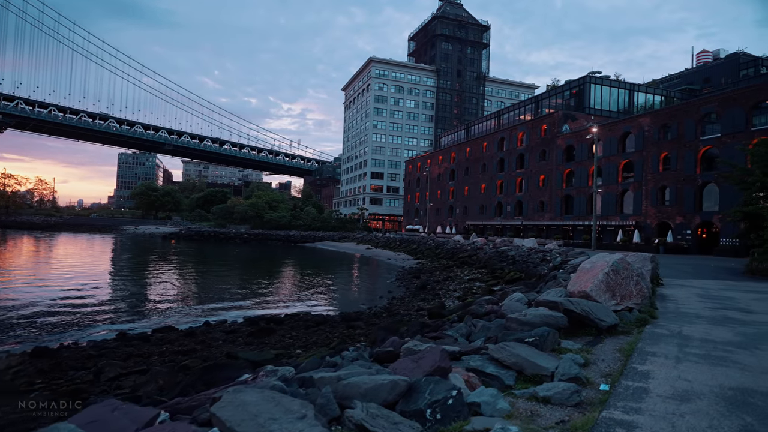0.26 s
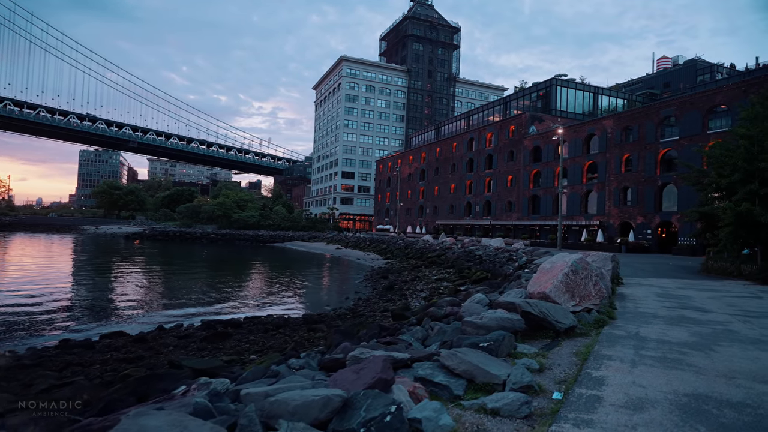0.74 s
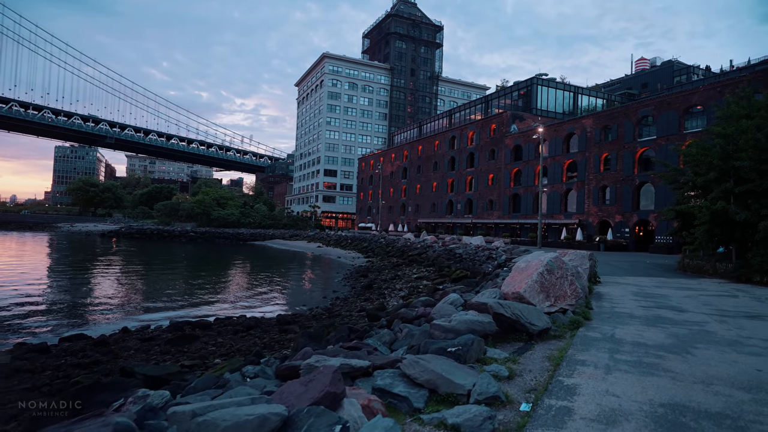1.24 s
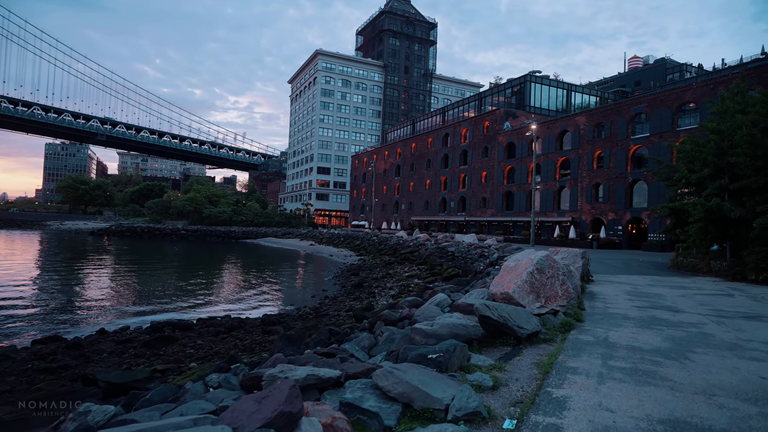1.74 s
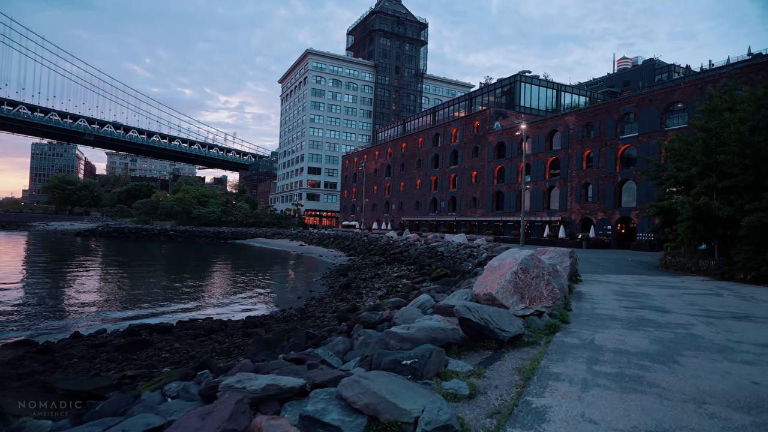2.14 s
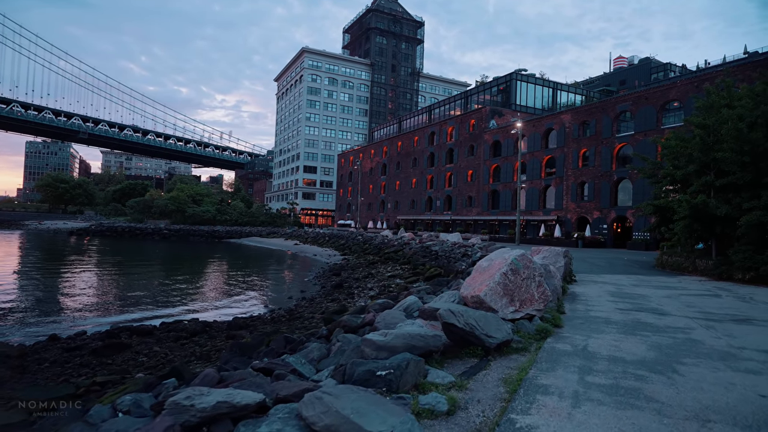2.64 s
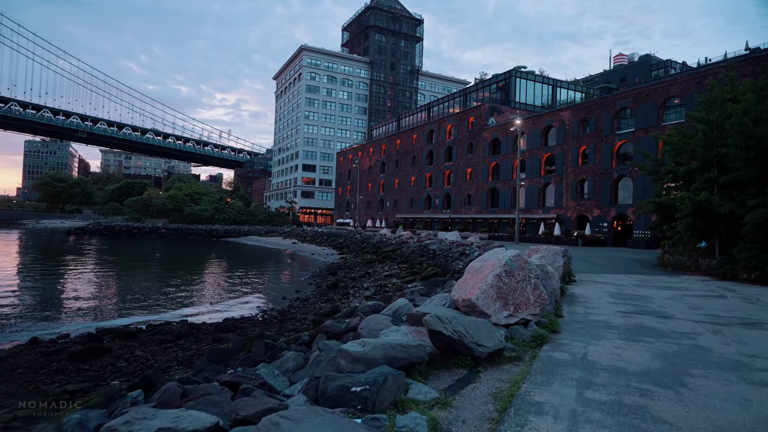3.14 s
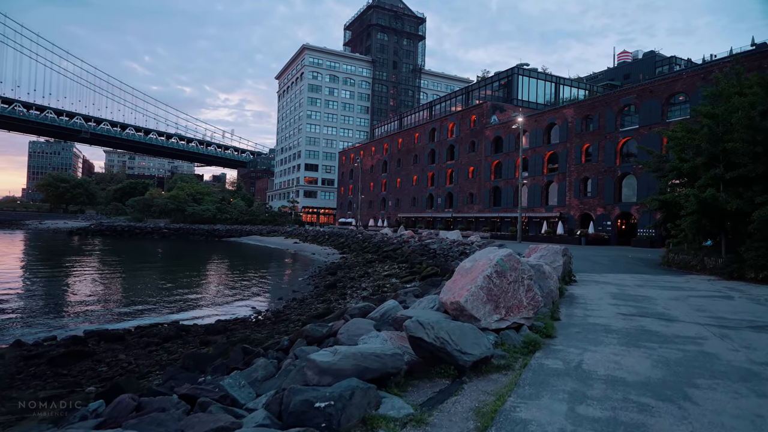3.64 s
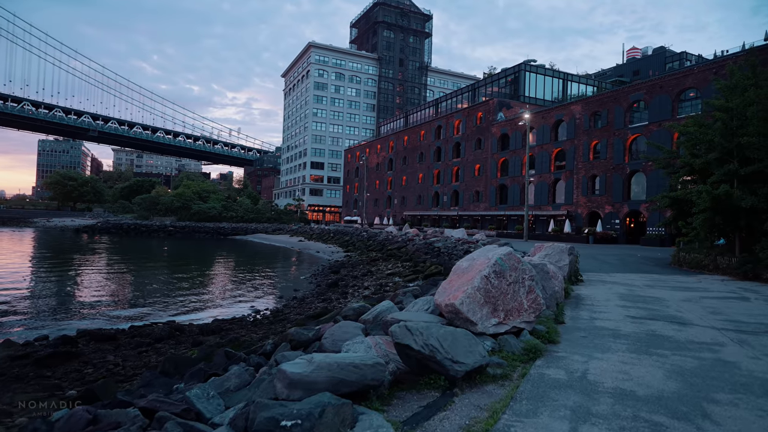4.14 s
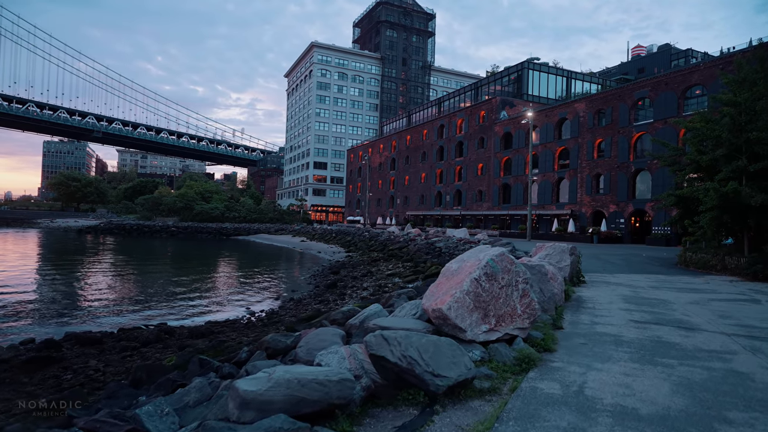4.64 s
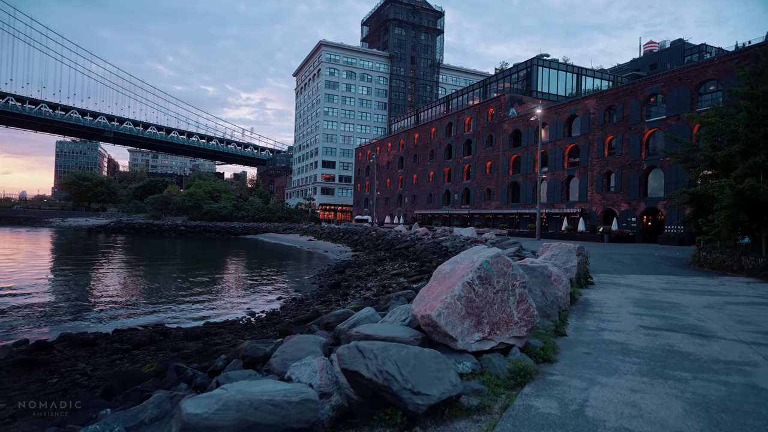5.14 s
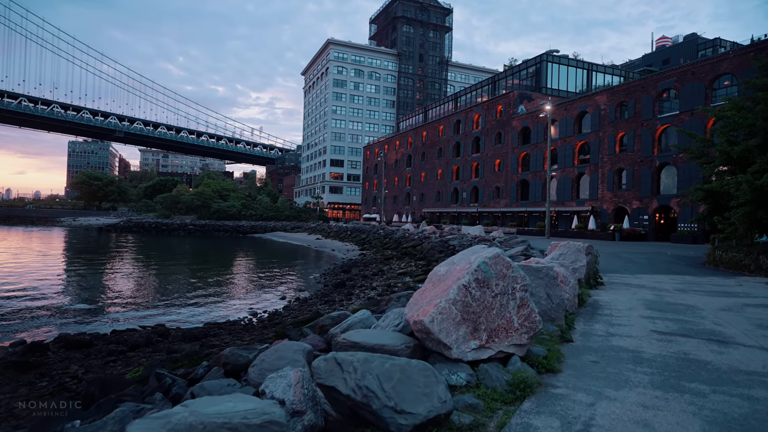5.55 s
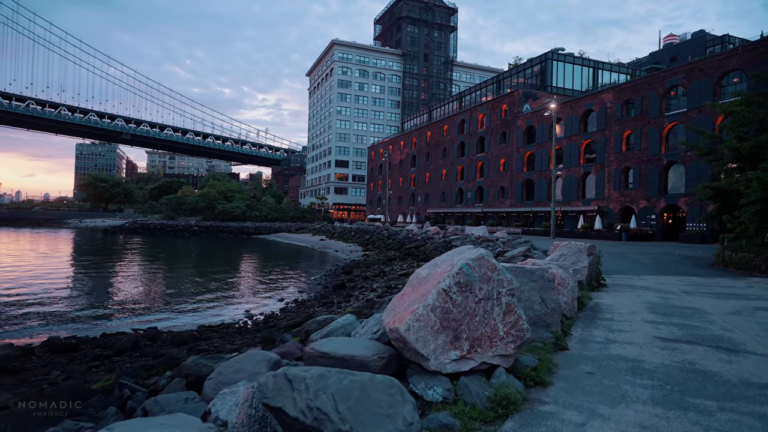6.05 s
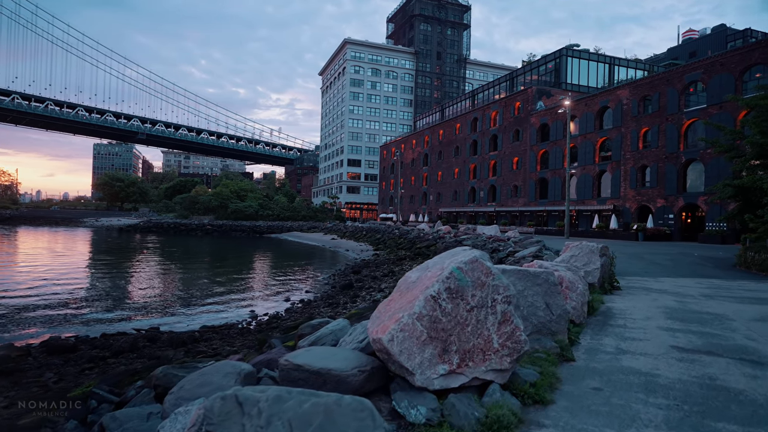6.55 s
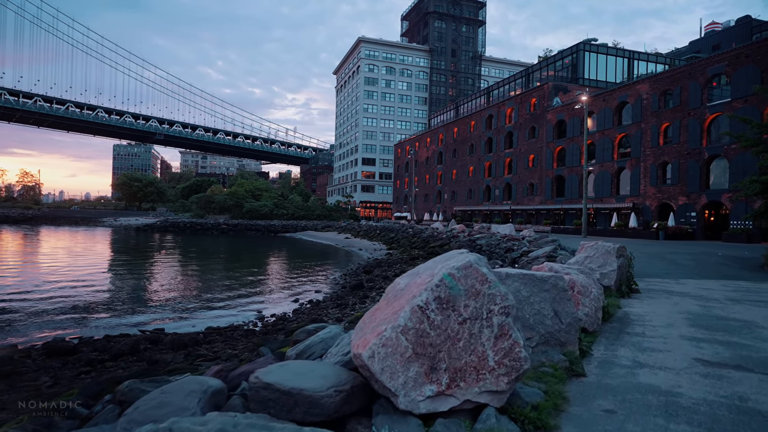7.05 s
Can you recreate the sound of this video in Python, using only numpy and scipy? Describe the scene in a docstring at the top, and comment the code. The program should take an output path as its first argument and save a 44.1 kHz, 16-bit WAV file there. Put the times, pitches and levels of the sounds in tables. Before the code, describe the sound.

Small waves slosh and gulp among shoreline rocks, drops ticking to the left, while faint birds chirp over a deep, distant city traffic rumble.

```python
"""Rocky river cove at dusk

Close by, small waves slosh among the stones as filtered noise and swarms of ringing bubbles; air pockets gulp,
mostly to the left, water slaps on rock, and drops tick well left over crackle and foam.
Small birds sing faintly on both sides, as gliding tones echoed by the buildings along the shore.
Far away the city rumbles, drones and roars as shaped noise; a light breeze presses on the microphones."""
import sys
import numpy as np
from scipy import signal
from scipy.fft import rfft, irfft
from scipy.io import wavfile
from scipy.ndimage import uniform_filter1d

SR = 44100
rng = np.random.default_rng(int(sys.argv[2]) if len(sys.argv) > 2 else 0)


def master_out(mix):
    """Clip the mix to full scale and print it as 16-bit PCM to the path in sys.argv[1]."""
    frames = np.transpose(np.atleast_2d(mix))
    ceiling = np.clip(frames, -1, 1)
    pcm = np.round(ceiling * 32767).astype(np.int16)
    wavfile.write(sys.argv[1], SR, pcm)


N = 321489

# Wavelets reaching the stones about every 0.7 s: crest t/s, slosh gain level/dB, fizz gain level/dB
WAVES = [(.03, -38, -73), (.88, -38, -62.5), (1.62, -35.5, -67), (2.18, -41.5, -87), (2.92, -35.5, -71),
         (3.55, -37.5, -71.5), (4.3, -41.5, -89), (5.22, -37, -67.5), (5.85, -45, -66.5),
         (6.38, -44.5, -67.5), (7.1, -41, -68)]
# Colour of the slosh: f/Hz, relative density level/dB per Hz
SLOSH_SPECTRUM = [(120, -29), (270, 18), (400, 6), (520, 2.5), (700, 8.5), (950, -4), (1400, -8.5),
                  (2400, -73), (6000, -94)]
# Large air pockets gulping between the stones: t/s, nominal peak level/dB, f/Hz, left over right level/dB
GULPS = [(.927, -31, 514, 5), (.980, -37, 416, 14), (1.118, -36, 876, 16), (1.848, -33, 1140, 9),
         (2.916, -34, 1240, 4), (4.392, -28, 453, -8), (4.526, -26.5, 880, -2), (5.232, -28.5, 804, 13),
         (5.869, -34, 1053, 5), (6.322, -24, 641, 1)]
# Flat slaps of water on rock: t/s, rms at the start level/dB, centre f/Hz, decay time constant t/ms
SLAPS = [(0.4032, -37, 950, 2.5), (1.823, -43, 1500, 5.9), (5.8687, -31, 790, 6.6), (6.323, -54, 633, 14)]
# Loudest drops and bursting bubbles: t/s, nominal peak level/dB, ring f/Hz, share of splash [0-1]
DROPS = [(.347, -46, 9170, .3), (.4535, -46, 5250, 0.6), (.567, -44, 4820, 1), (.6735, -42, 8350, 0.2),
         (.8975, -34, 2920, 0.12), (.9, -27, 4800, 0.45), (0.8988, -32, 7200, 0.07),
         (1.0042, -47, 3190, 0.02), (1.077, -44.5, 3880, 0.06), (1.1177, -38, 4300, 0.47),
         (1.1986, -32.5, 9900, 0.24), (1.2, -50, 3190, 0.06), (1.437, -39.5, 5230, 0.26),
         (1.8232, -44, 2630, 1), (2.6802, -45, 3450, 0.2), (2.704, -39.5, 4180, 0.74),
         (2.7195, -45, 5200, 0.4), (2.7935, -42, 6840, .4), (3.117, -41.5, 5600, 0.55),
         (3.7775, -40, 4720, 0.5), (3.9904, -43, 5580, .6), (5.2339, -39.5, 4390, 0.56),
         (5.3018, -39.5, 2640, .6), (5.669, -38.5, 4830, 0.23), (5.7724, -43, 3530, 0.32),
         (5.965, -39, 2600, 0.4), (6.0947, -45, 3070, 0.5), (6.598, -41.5, 2720, 0.3),
         (6.7756, -45, 6650, 0.3)]
# Foam on wet stones: f/Hz, relative density level/dB per Hz
FOAM_SPECTRUM = [(1500, -15), (3500, 3), (6500, 0), (9000, -5), (13000, -8), (16000, -1)]

# Syllable shapes, all with columns: share of the length [0-1], pitch factor [ratio], loudness [0-1]
ARCH_SHAPE = [(0, 0.7, 0.1), (.12, .8, 0.93), (.22, .88, 0), (.33, 0.98, 0.64), (.5, 1, 0.25), (.62, 1, 0),
              (.73, .93, 0.16), (.87, .85, 0.93), (1, .81, .2)]
# a slur that ends lower than its early peak
SLUR_SHAPE = [(0, 1, 0.15), (.3, 1.05, 0.55), (.6, 0.89, 0.61), (1, 0.98, 0.81)]
# a rising whistle
WHISTLE_SHAPE = [(0, .76, 0), (.2, .8, .4), (.45, .86, .35), (.62, .92, .4), (.75, .98, .9), (.86, 1, 1),
                 (.93, .98, .7), (.98, .9, .3), (1, .87, 0)]
# a buzz, falling at its end
BUZZ_SHAPE = [(0, .96, 0.84), (.2, 1.01, 0.5), (.7, 1, .9), (1, 0.83, 0.072)]
# an upward glide, for lisps and the whistle's overtone
LISP_SHAPE = [(0, .95, 0.2), (.3, .98, 0.7), (.7, 1.01, 0.68), (1, 1.04, 0.4)]
# a short hooked note
HOOK_SHAPE = [(0, 1.04, 0), (.3, 1.03, .8), (.65, .98, 1), (1, .92, 0)]
# a steep downward tick
TICK_SHAPE = [(0, 1.11, 0.2), (.3, 1.03, 0.7), (.65, .97, 1), (1, 0.76, 0.2)]

# Bird phrases, all with columns: first note t/s, last note t/s, rate [notes/s], note length t/s, pitch f/Hz,
# peak before the mix level/dB, left over right level/dB. First the arched warbles
WARBLES = [(.055, .789, 8.2, .094, 5290, -49.5, 4), (5.179, 5.922, 8.1, .092, 5200, -48, 1)]
# trills of quick ticks
TRILLS = [(.034, .134, 10.2, .012, 5820, -51, -4), (1.334, 2.507, 23.1, 0.011, 5540, -55.5, -9),
          (3.167, 4.333, 10.3, .013, 6000, -55.5, -3)]
# low hooked calls
HOOKS = [(.035, .605, 8.8, .024, 2760, -54.5, -2), (4.677, 5.248, 8.8, 0.0254, 2805, -49.5, -1)]
# soft peeps between the buzzes
PEEPS = [(3.239, 3.758, 7.7, 0.034, 3800, -54.5, -1)]
# buzzes
BUZZES = [(2.783, 3.695, 7.7, 0.037, 4120, -52, -1), (6.122, 6.495, 8, .034, 4150, -52, 1)]

# Single bird notes, all with columns: start t/s, length t/s, pitch f/Hz, peak before the mix level/dB,
# left over right level/dB. First the rising whistle
WHISTLES = [(5.32, .33, 3480, -50.5, 9)]
# thin lisps, and at 5.54 s a high overtone of the rising whistle
LISPS_AND_OVERTONE = [(2.445, 0.12, 3668, -60, 4), (3.52, 0.058, 6500, -67, 4),
                      (3.83, 0.051, 4300, -55, -9), (5.54, 0.068, 8460, -62, -7),
                      (6.86, .03, 4250, -52, -11)]
# ragged downward slurs
SLURS = [(2.562, 0.066, 5040, -54.5, -11), (3.915, 0.028, 4550, -57, -4), (4.04, .022, 4450, -53, -4),
         (4.095, .022, 4100, -56, 1)]
# harsh chirps from farther off
CHIRPS = [(.53, .079, 4860, -57, -11), (.61, 0.07, 4360, -56, -15), (1.93, 0.092, 4050, -57, -12),
          (2.645, 0.048, 4320, -50, -7), (2.85, .087, 4250, -51.5, -4), (3.775, .051, 4850, -50, -9),
          (3.84, 0.094, 4400, -53, -7), (5.32, .041, 4940, -53, -10), (5.36, 0.084, 4370, -57, -10),
          (5.88, 0.1, 4060, -59, -19), (6.96, .064, 5150, -53, -7), (7.01, 0.077, 4430, -55, -12)]
# The shore's echo: f/Hz, time to decay by 60 dB t/s
ECHO_T60 = [(300, 0.42), (3000, 0.81), (6000, 0.68), (14000, 0.45)]

# Deep rumble of far heavy traffic: t/s, level/dB
TRAFFIC = [(0, -31), (.65, -28.5), (1.5, -27.5), (2.3, -31), (3.6, -29.5), (3.95, -26), (4.75, -29),
           (5.6, -28.5), (7.29, -29.5)]
# Engines swelling as heavy vehicles pass: t/s, drone level/dB
ENGINES = [(0, -33.5), (.17, -31.5), (.45, -38), (1.4, -36.5), (2.1, -38.5), (3.2, -37), (3.7, -42.5),
           (4.42, -34.5), (5.1, -35), (6.0, -40), (6.6, -37), (7.29, -39.5)]
# Tyre roar of far roads, slowly growing overall: t/s, level/dB
ROADS = [(0, -39.5), (2.5, -40.5), (4, -38.5), (5.7, -38.5), (7.29, -37.5)]
# Colour of the deep rumble: f/Hz, relative density level/dB per Hz
RUMBLE_SPECTRUM = [(12, -20), (21, 0), (30, -1), (39, 0), (50, -3.5), (62, -4.5), (80, -6.5), (100, -8),
                   (125, -16), (180, -34), (400, -70)]
# Colour of the engine drone: f/Hz, relative density level/dB per Hz
DRONE_SPECTRUM = [(50, -38), (90, 0.5), (120, -2), (160, -2.5), (205, -1.5), (245, -9), (290, -18),
                  (420, -15.5), (900, -75)]
# Colour of the tyre roar: f/Hz, relative density level/dB per Hz
ROAR_SPECTRUM = [(80, -6.5), (200, -11), (300, -3), (480, 1.5), (700, 1.5), (980, 0), (1250, -6),
                 (1550, -9), (2000, -15.5), (2500, -24), (3300, -29.5), (4500, -33), (6500, -41.5),
                 (16000, -57)]
# Slow air pressure on the microphones: f/Hz, relative density level/dB per Hz
BREEZE_SPECTRUM = [(1, -25), (4, -4), (9, 0), (16, -3), (22, -14), (40, -45), (200, -100)]
# Likeness of the left and right microphones in diffuse sound: f/Hz, correlation [-1 to 1]
LIKENESS = [(20, 0.99), (100, 0.87), (195, 1), (260, 0.13), (320, 0.19), (430, 0.063), (640, -0.45),
            (900, -0.13), (1300, -0.11), (1650, -0.16), (2500, 0.072), (5000, -0.34), (8000, -0.62),
            (16000, -0.78)]

# Each wavelet swells and falls back; the fizz comes later and drains for longer (t/s)
SWELL_S, FALL_S, FIZZ_LAG_S, FIZZ_SWELL_S, DRAIN_S = 0.16, 0.32, 0.2, 0.42, 0.4
# Gain of slosh and fizz between wavelets (level/dB)
CALM_SLOSH_DB, CALM_FIZZ_DB = -44.5, -73.5
GULP_DECAY_MS = 7.8
# A clean drop's ring time constant in cycles, shortened by splash (per share of splash)
DROP_CYCLES, SPLASH_DAMPING = 8.7, 5.5
# Middle level of the lesser drops, and the foam's hiss relative to the crackle (level/dB)
STRAY_DB, FOAM_DB = -53, -5.5
# A phrase starts softly (dB, s) and is softer at both ends (dB)
WARM_UP_DB, WARM_UP_S, PHRASE_FADE_DB = 7.5, 0.08, 2.5
# Standard deviation of note strength (dB) and pitch (share)
NOTE_WAVER_DB, NOTE_WAVER = 2, 0.012
SMOOTH_DB = 1.5  # depth of the patches in hiss and foam
EDGE_HZ = 15900  # upper band limit of the recorder


def lapping():
    """Each wave sloshes between the stones and traps a swarm of bubbles; a few large pockets gulp."""
    swarm = np.zeros((2, N))
    for when, pitch, size, side, ring in rng.random((1300, 5)):
        hz = 390 * 4 ** pitch
        decay_ms = (3500 + 4500 * ring) / hz  # small bubbles die sooner
        ringing = bubble(hz, decay_ms, rise=0.035)
        gain = amp(11 * size ** 2 - 10 * pitch)
        add(swarm, when * N / SR, panned(gain * ringing, left_db=12 * side - 4))
    slosh = amp(-4.5) * wash(SLOSH_SPECTRUM, patchy_db=2) + amp(-10) * evened(swarm)
    water = surge(CALM_SLOSH_DB, 0, SWELL_S, FALL_S, axis=1) * slosh
    for s, db, hz, left_db in GULPS:
        ringing = bubble(hz, GULP_DECAY_MS, rise=0.012)
        swell = 1 - np.exp(-np.arange(len(ringing)) / SR / 0.0025)
        add(water, s, panned(amp(db) * ringing * swell, left_db))
    return water


def surge(calm_db, lag, swell, fall, axis):
    """The water's motion as a gain: each wavelet swells to its crest and falls away, over the calm level."""
    power = amp(calm_db) ** 2
    for wave in WAVES:
        age = np.arange(N) / SR - wave[0] - lag
        shape = np.exp(-(np.minimum(age, 0) / swell) ** 2 - np.maximum(age, 0) / fall)
        power = power + (amp(wave[axis]) * shape) ** 2
    return np.sqrt(power)


def bubble(hz, decay_ms, rise):
    """A ringing air pocket whose pitch climbs as it nears the surface."""
    tau = max(decay_ms, 0.05) / 1000
    age = np.arange(int(7 * tau * SR)) / SR / tau  # in time constants
    climbing_hz = hz * (1 + rise * (age - 1))
    return np.exp(-age) * np.sin(2 * np.pi * np.cumsum(climbing_hz) / SR)


def slaps():
    """A wavelet hits a hollow among the rocks: a brief dull burst of band-limited noise."""
    out, t = np.zeros((2, N)), np.arange(SR // 10) / SR
    for s, db, hz, decay_ms in SLAPS:
        hollow = signal.butter(2, [hz / 2, hz * 1.38], "band", fs=SR, output="sos")
        burst = evened(signal.sosfilt(hollow, rng.standard_normal(len(t))))
        add(out, s, panned(amp(db) * burst * np.exp(-1000 * t / decay_ms), left_db=3))
    return out


def drips():
    """Loud close drops and lesser strays, over crackle and foam that thicken as the water drains."""
    near, crackle = np.zeros((2, N)), np.zeros((2, N))
    fizz = surge(CALM_FIZZ_DB, FIZZ_LAG_S, FIZZ_SWELL_S, DRAIN_S, axis=2)
    strays = [(when * N / SR, STRAY_DB + 8 * (size - 0.5), 3400 * 3.9 ** pitch, 0.83 * splash)
              for when, size, pitch, splash in rng.random((36, 4))]
    for s, db, hz, splash in [*DROPS, *strays]:
        decay_ms = 1000 * DROP_CYCLES / (1 + SPLASH_DAMPING * splash) / hz
        add(near, s, panned(amp(db) * drop(hz, decay_ms, splash), left_db=11.5))
    for when, pitch, size, side, ring in rng.random((2200, 5)):
        hz = 2400 * 5.2 ** pitch
        tick = drop(hz, decay_ms=(1500 + 4500 * ring ** 2) / hz, splash=0.39)
        gain = amp(13.4 * size ** 4 - 4 * pitch)
        add(crackle, when * N / SR, panned(gain * tick, left_db=1.0 + 6.6 * side))
    foam = panned(amp(FOAM_DB) * wash(FOAM_SPECTRUM, patchy_db=SMOOTH_DB), left_db=2.5)
    return near + fizz * (evened(crackle) + foam)


def drop(hz, decay_ms, splash):
    """A quick splash, a small ringing bubble and a short spatter off the stones."""
    t = np.arange(SR // 30) / SR
    ring = np.pad(bubble(hz, decay_ms, rise=0.024), (0, len(t)))[:len(t)]
    spray_band = signal.butter(2, [3200, 12000], "band", fs=SR, output="sos")
    spray = signal.sosfilt(spray_band, rng.standard_normal((2, len(t))))
    crack = np.exp(-t / 0.0005) * (1.1 * spray[0] + 0.6 * spray)  # partly shared by both sides
    spatter = amp(-25) * np.exp(-t / 0.005) * spray
    splash = np.clip(splash, 0, 1)
    onset = 1 - np.exp(-t / 0.00015)  # a slightly softened onset to each drop
    return 1.2 * onset * ((1.2 - splash / 2) * ring + splash * crack + spatter)


def birds():
    """Nearer singers arrive clear; the harsh chirps from farther off carry more echo."""
    near = calls(phrases(WARBLES), ARCH_SHAPE)
    near += calls(phrases(TRILLS), TICK_SHAPE, bounce_db=-5, rough=0.008)
    near += calls(phrases(HOOKS), HOOK_SHAPE, rough=0.03)
    near += calls(phrases(PEEPS), HOOK_SHAPE)
    near += calls(phrases(BUZZES), BUZZ_SHAPE, flutter=0.072, flutter_hz=111.6, rough=0.0076)
    near += calls(WHISTLES, WHISTLE_SHAPE, bounce_db=-19, rough=0.002, second_db=-21)
    near += calls(LISPS_AND_OVERTONE, LISP_SHAPE, rough=0.0062)
    near += calls(SLURS, SLUR_SHAPE, rough=0.029)
    far = calls(CHIRPS, SLUR_SHAPE, flutter=0.08, flutter_hz=71.7, rough=0.039) + chorus()
    echo = shore(amp(-13) * near + amp(-10) * far)
    return amp(-4.5) * near + amp(-5.0) * far + echo


def phrases(rows):
    """Evenly repeated notes that start softly, swell toward the middle and waver in pitch and strength."""
    notes = []
    for first, last, rate, length, hz, db, left_db in rows:
        for place in np.linspace(0, 1, round((last - first) * rate) + 1):
            age = place * (last - first)
            sharp, strong = rng.standard_normal(2)
            soft_db = WARM_UP_DB * np.exp(-age / WARM_UP_S) + PHRASE_FADE_DB * (2 * place - 1) ** 2
            note_hz = hz * (1 + NOTE_WAVER * sharp)
            note_db = db - soft_db + NOTE_WAVER_DB * strong
            notes.append((first + age, length, note_hz, note_db, left_db))
    return notes


def calls(rows, shape, bounce_db=-14, **voice):
    """Syllables of one shape, each blurred by a few early bounces off stones and paving."""
    song = np.zeros((2, N))
    for s, length, hz, db, left_db in rows:
        note = panned(amp(db) * syllable(shape, length, hz, **voice), left_db)
        add(song, s, note)
        for delay, left, right in rng.random((4, 3)):
            strength = 2 * np.array([[left], [right]]) - 1  # either polarity on each side
            add(song, s + 0.0037 + 0.018 * delay, amp(bounce_db) * strength * note)
    return song


def syllable(shape, length, hz, flutter=0, flutter_hz=105, rough=0.0034, second_db=-32):
    """A bird tone with a weak second harmonic, gliding along a shape, with flutter and pitch jitter."""
    t = np.arange(int(max(length, 0.005) * SR)) / SR
    at, pitch, loud = np.transpose(shape)
    jitter = evened(uniform_filter1d(rng.standard_normal(len(t)), size=60))
    bend = 1 - flutter * np.cos(2 * np.pi * flutter_hz * t) + rough * jitter
    glide = np.interp(t / t[-1], at, pitch)
    phase = 2 * np.pi * np.cumsum(hz * glide * bend) / SR
    tone = np.sin(phase) + amp(second_db) * np.sin(2 * phase)
    return np.interp(t / t[-1], at, loud) * tone


def chorus():
    """Many faint birds twitter at random in the far trees, half in slurs and half in fluttering lisps."""
    rows = [(when * N / SR, 0.015 + 0.045 * length, 2900 + 2300 * pitch, -63 + 4 * size, 3 - 9 * side)
            for when, length, pitch, size, side in rng.random((80, 5))]
    slurs = calls(rows[::2], SLUR_SHAPE, rough=0.034)
    return slurs + calls(rows[1::2], LISP_SHAPE, flutter=0.04, flutter_hz=78.4)


def shore(x):
    """Scattered echoes from stones and walls, decaying at a rate set for each frequency."""
    sparse = rng.random((2, SR)) < 2500 / SR  # about 2500 reflections a second
    taps = rng.standard_normal((2, SR)) * sparse
    hz, t, z = signal.stft(taps, SR, nperseg=256)
    decay = amp(-60 * t / read(ECHO_T60, hz)[:, None])
    tail = signal.istft(z * decay, SR, nperseg=256)[1]
    return signal.fftconvolve(x, tail / np.linalg.norm(tail[0]), axes=1)[:, :N]


def city():
    """A light breeze, deep rumble, engines a little to the right, tyre roar and a thin steady hiss."""
    breeze = amp(-27.5) * deep_noise(BREEZE_SPECTRUM, likeness=0.75)
    rumble = amp(curve(TRAFFIC, axis=1)) * deep_noise(RUMBLE_SPECTRUM, likeness=0.84)
    drone = amp(curve(ENGINES, axis=1)) * wash(DRONE_SPECTRUM, patchy_db=2)
    roar = amp(curve(ROADS, axis=1)) * wash(ROAR_SPECTRUM, patchy_db=1.02)
    hiss_spectrum = [(1000, 7), (4000, 4), (8000, -19.0), (12000, 9), (16000, 7)]  # f/Hz, level/dB per Hz
    hiss = amp(-78) * wash(hiss_spectrum, patchy_db=SMOOTH_DB)
    low = panned(breeze, left_db=1.5) + panned(rumble, left_db=1.0) + panned(drone, left_db=-3.0)
    return low + panned(roar, left_db=1.5) + panned(hiss, left_db=6.0)


def deep_noise(spectrum, likeness):
    """Low noise, its long waves nearly alike in both microphones."""
    gain = amp(read(spectrum, np.fft.rfftfreq(N, 1 / SR)))
    a, b = evened(irfft(rfft(rng.standard_normal((2, N))) * gain, N))
    likeness = np.clip(likeness, -1, 1)
    return np.array([a, likeness * a + np.sqrt(1 - likeness ** 2) * b])


def wash(spectrum, patchy_db):
    """Diffuse stereo noise whose level drifts in patches of time and pitch."""
    frames, hz = N // 512 + 6, np.fft.rfftfreq(2048, 1 / SR)
    a, b, c, d, patches = np.moveaxis(rng.standard_normal((frames, len(hz), 5)), -1, 0)
    patches = uniform_filter1d(patches, size=6, axis=0)  # smooth in time
    patches = evened(uniform_filter1d(patches, size=9, axis=1))  # then in frequency
    same = np.clip(read(LIKENESS, hz), -1, 1)
    left = a + 1j * b
    right = same * left + np.sqrt(1 - same ** 2) * (c + 1j * d)
    z = np.array([left, right]) * amp(read(spectrum, hz) + patchy_db * patches)
    return evened(signal.istft(z.swapaxes(1, 2), nperseg=2048, noverlap=1536)[1][:, :N])


def amp(db):
    """Decibels to gain."""
    return 10 ** (np.asarray(db) / 20)


def evened(x):
    """Scales to an rms of 1."""
    return x / np.sqrt(np.mean(x ** 2) + 1e-20)


def read(points, hz):
    """A table over frequency, read at any frequency on a logarithmic scale."""
    f, value = np.transpose(points)
    return np.interp(np.log(hz + 1), np.log(f + 1), value)


def curve(rows, axis):
    """One column of a control table at every sample."""
    rows = np.asarray(rows)
    return np.interp(np.arange(N) / SR, rows[:, 0], rows[:, axis])


def panned(x, left_db):
    """Leans a sound to the left by a level difference."""
    return x * amp(np.array([[left_db], [-left_db]]) / 2)


def add(mix, s, sound):
    """Mixes a stereo sound in at a time."""
    part = mix[:, max(round(s * SR), 0):][:, :sound.shape[1]]
    part += sound[:, :part.shape[1]]


def scene():
    """Water close by, birds around it and the city far off, in the open air."""
    drops = drips()
    water = lapping() + slaps() + drops + amp(-18) * shore(drops)
    return water + birds() + city()


def record(dry):
    """A 4 ms fade at both ends, then the recorder's band limit."""
    to_nearest_end = np.minimum(np.arange(N), np.arange(N)[::-1])
    fade = np.minimum(to_nearest_end / (0.004 * SR), 1)
    band_limit = signal.firwin(511, EDGE_HZ, window=("kaiser", 9), fs=SR)
    return signal.oaconvolve(dry * fade, band_limit[None], "same")


dry = scene()
out = record(dry)
master_out(out)
```